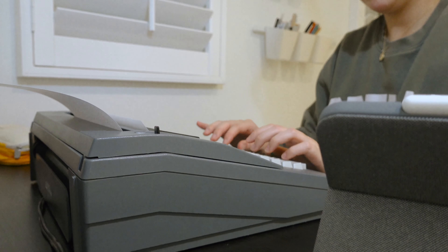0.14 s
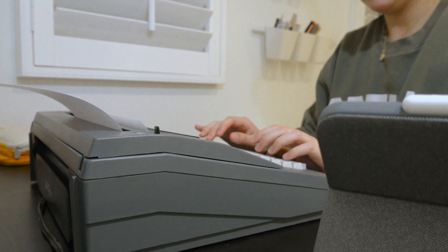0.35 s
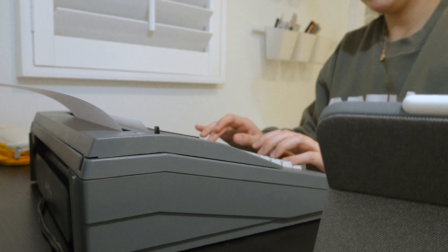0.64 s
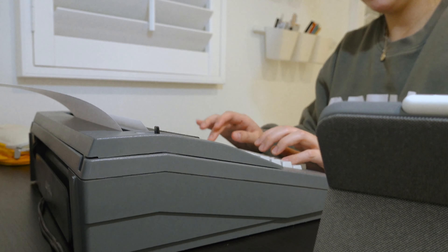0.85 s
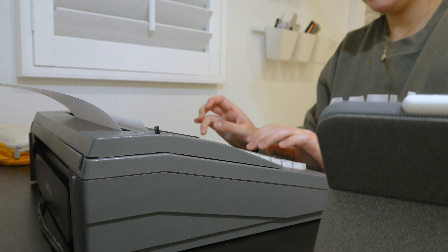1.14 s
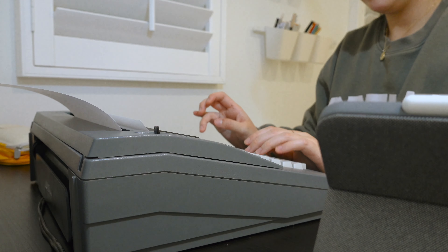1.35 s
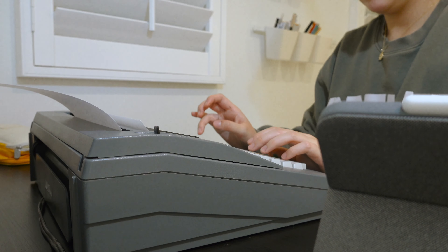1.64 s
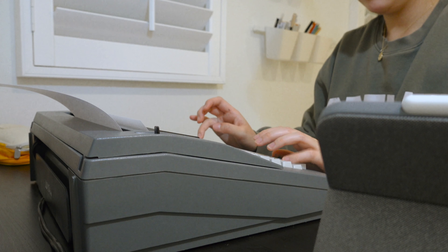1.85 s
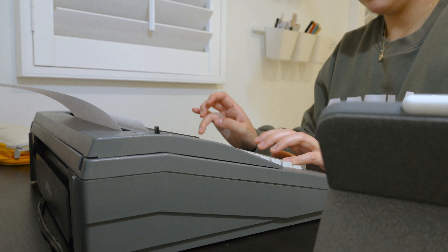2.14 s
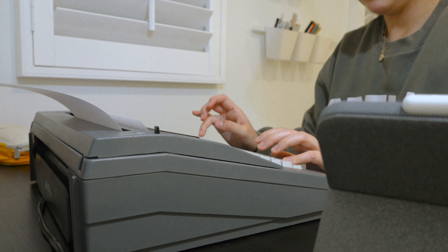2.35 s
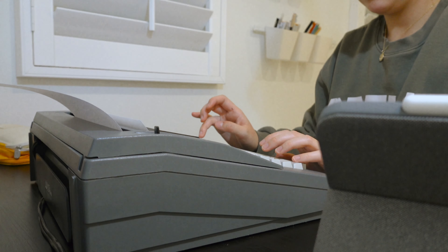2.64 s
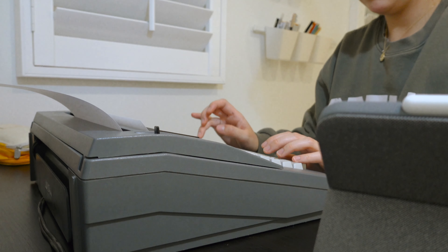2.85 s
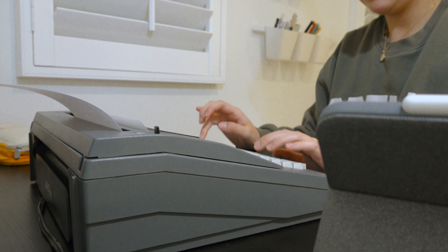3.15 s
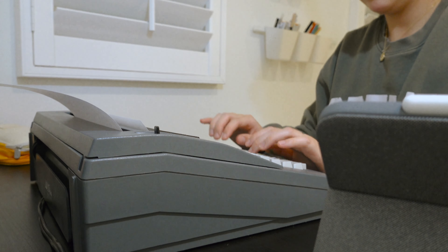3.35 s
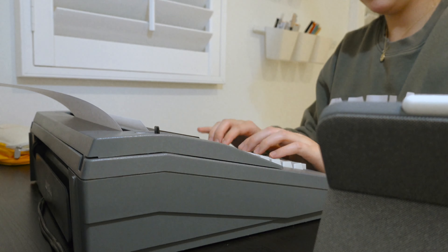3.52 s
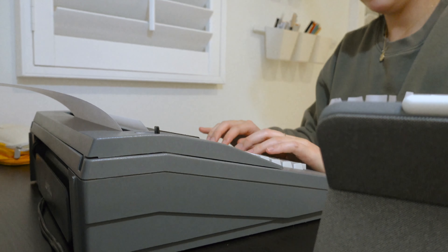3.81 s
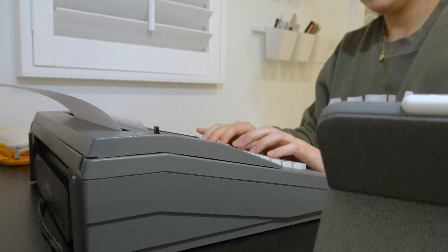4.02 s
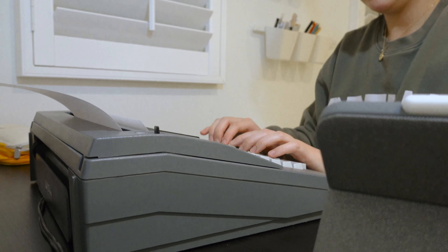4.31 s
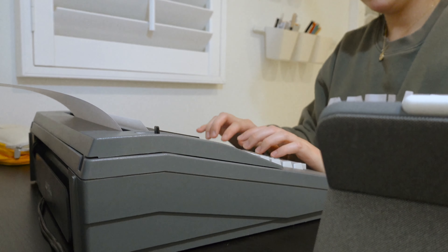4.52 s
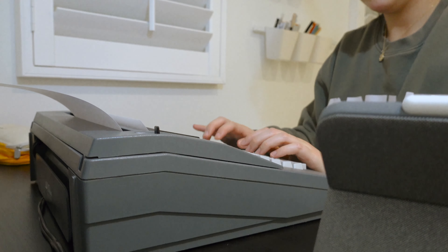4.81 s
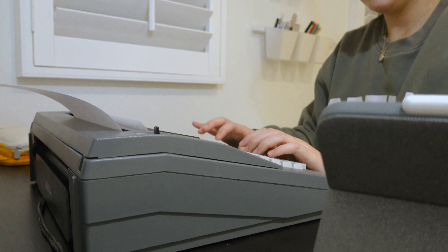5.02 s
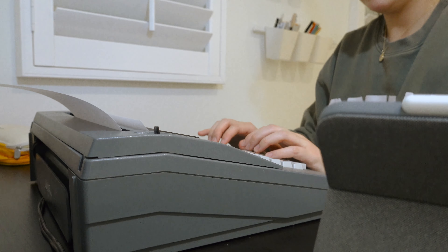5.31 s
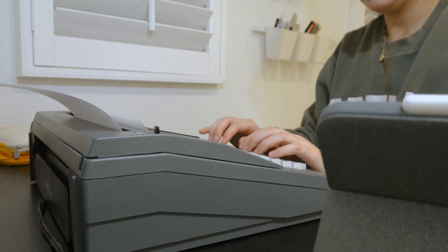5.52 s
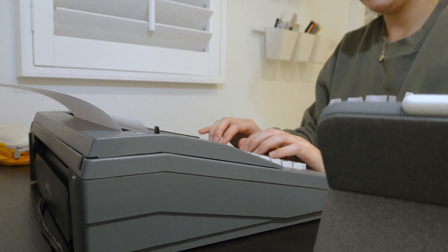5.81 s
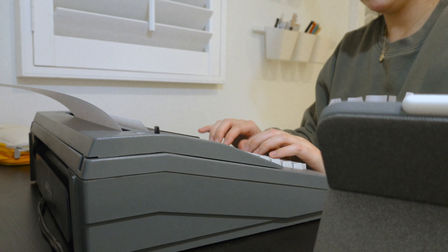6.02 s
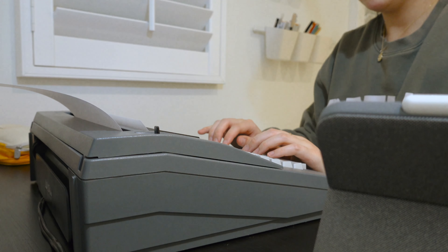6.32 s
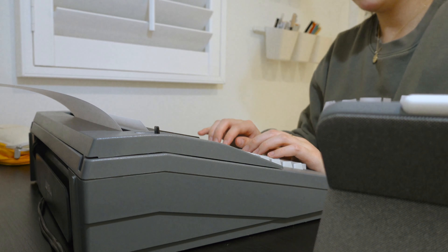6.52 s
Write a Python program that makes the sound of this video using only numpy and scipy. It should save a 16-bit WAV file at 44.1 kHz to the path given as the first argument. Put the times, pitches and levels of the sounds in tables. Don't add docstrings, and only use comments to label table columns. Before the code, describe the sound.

An electric typewriter fires sharp clattering strikes, first a lone one, then a quick run, with brief motor buzzes and quiet key clicks between.

```python
import sys
import numpy as np
from scipy import signal
from scipy.io import wavfile
from scipy.ndimage import uniform_filter1d

SR = 44100
rng = np.random.default_rng(int(sys.argv[2]) if len(sys.argv) > 2 else 0)


def wav_record(signal):
    frames = np.transpose(np.atleast_2d(signal))
    bounded = np.clip(frames, -1, 1)
    quanta = np.round(bounded * 32767).astype(np.int16)
    wavfile.write(sys.argv[1], SR, quanta)


def decibels_to_gain(level_db):
    exponent = np.asarray(level_db, float) / 20
    return 10 ** exponent


N = 294147
T = np.arange(N) / SR


def evened(x):
    return x / np.sqrt(np.mean(x ** 2) + 1e-20)


def unit(taps):
    return taps / np.linalg.norm(taps)


def read(points, hz, column=1):
    points = np.array(points)
    return np.interp(np.log(hz + 1), np.log(points[:, 0] + 1), points[:, column])


def add(mix, s, sound):
    part = mix[..., max(round(s * SR), 0):][..., :sound.shape[-1]]
    part += sound[..., :part.shape[-1]]


def filtered(x, ring):
    ring = ring.reshape((1,) * (x.ndim - 1) + (-1,))
    return signal.oaconvolve(x, ring, axes=-1)[..., :N]


def burst(levels_db, dies_ms, soft, onset_s=0.0012):
    t = T[:6000]
    dies_s = max(dies_ms / 1000, .0008)
    grain = np.minimum(rng.exponential(1, len(t) // 30), 3)
    grains = decibels_to_gain(2.6 * np.repeat(grain, 30))
    envelope = np.exp(-t / dies_s) * (1 - np.exp(-t / onset_s)) * grains
    force = envelope * rng.standard_normal((len(t), 3, 2)).T
    force /= np.linalg.norm(force, axis=2, keepdims=True)
    force[..., 8] += 0.37
    contact = unit(np.convolve([1, soft], [1, soft]))
    force[:, 1] = signal.lfilter(contact, [1], force[:, 1])
    return decibels_to_gain(np.array(levels_db))[:, None] * np.sqrt(dies_s * SR / 2) * force


def hammer_boom_db(force_db):
    return -21.5 + 0.42 * force_db


# start_s, force_db, brightness_db, hammer_return_ms, return_treble_db (against the hit)
STRIKES = [(0.8708, -13, -3, 22.8, -0.5), (3.1674, -15.5, -2, 25.3, -4), (3.3824, -12, -2, 21, -4),
           (3.8576, -12.5, -3, 20, -6.5), (4.0149, -12.5, -0.5, 23.3, -4), (4.1511, -12, -1.5, 21.7, -3.5),
           (4.2743, -12.5, -3, 19, -0.6), (4.3718, -12.5, -1.5, 22.9, -1.5), (4.7596, -12, -2, 24.1, -5),
           (4.9436, -13, -1, 23, -3.5), (5.0419, -13, -1.5, 22, -3), (5.3135, -12.5, -1.5, 24.1, -8.5)]
# delay_s, clatter_db, treble_db, knock_db, dies_ms, softness_0_1
BLOWS = [
    (0, 3.5, 5.5, -4, 4.15, 0.8),
    (.009, 1, -11.5, 4, 4.6, 0.4),
    (0.0173, -17, -0.5, -11.5, 4.9, .8),
    (.036, -11.5, -12.5, -18, 30, 0.6),
    (.059, -6.5, -5.5, -3.5, 3.6, .6),
    (0.074, -19, -23, -19, 3, 0.4),
]
# clatter_db, treble_db, knock_db, dies_ms, softness_0_1
HAMMER_RETURN = (1, 3, -5, 5.5, 0.3)
# delay_s, level_db
SHOVES = [
    (0, 2.5),
    (.024, -11.5),
    (.052, -7.5),
]


def hammer_strikes():
    chatter, push = np.zeros((2, 3, N)), np.zeros(N)
    for s, clatter_db, bright_db, return_ms, return_db in STRIKES:
        treble_db = clatter_db + bright_db
        boom_db = hammer_boom_db(clatter_db)
        stop = HAMMER_RETURN
        back = (return_ms / 1000, stop[0], stop[1] + return_db, *stop[2:])
        for delay, a, b, c, dies, soft in BLOWS + [back]:
            levels_db = [clatter_db - 2 + a, treble_db - 4 + b, boom_db + c]
            add(chatter, s + delay, burst(levels_db, dies, soft))
        scatter = rng.standard_normal(600) * np.exp(-T[:600] * 1000 / 8.3)
        shove = signal.lfilter([1, -1], [1, -.96], 0.39 * unit(scatter))
        shove[0] += 1
        for delay, db in SHOVES:
            add(push, s + delay, decibels_to_gain(boom_db + 2 + db) * shove)
    return chatter, push


# clatter_db, treble_db, knock_db, boom_db, dies_ms
EARLIER = (-38, -46, -52.5, -31.5, 61.5)
# start_s, clatter_db, brightness_db, weight_db
WHEEL = [(0.772, -32.5, -1, -15), (0.784, -20.5, -9.5, -17.5), (0.82, -20, -7.5, -16.5),
         (0.975, -32, -17, 0), (3.078, -27, -9, -21), (3.088, -20, -3.5, -19.5), (3.115, -23, -12, -19.5),
         (3.129, -35, -4.5, -4), (3.319, -16, 1, -20), (3.335, -37, 12, 5.5), (3.565, -31.5, -6.5, -5),
         (3.609, -31, -4.5, -18.5), (3.635, -47.5, -0.5, 5), (3.802, -24.5, -9, -16.5),
         (4.09, -27, -14, -1.5), (4.565, -31, -1, -24.5), (4.676, -16.5, -4.5, -17.5),
         (4.69, -25.5, -2, -10.5), (4.709, -24.5, -10.5, -12), (4.86, -24, 5, -11.5),
         (4.868, -16.5, -13, -11.5), (4.895, -24, 1, -16), (4.905, -18.5, -10, -22.5),
         (5.02, -24, -12.5, -8), (5.259, -25.5, -5.5, -12.5), (5.271, -38.5, -13.5, -0.5)]
# start_s, clatter_db, brightness_db, weight_db
LATCHES = [(0.121, -31, -6.5, -10), (0.225, -35.5, -7.5, -3), (0.305, -43, 2, -16.5),
           (0.614, -46, -2.5, -10.5), (0.647, -28, -6.5, -13.5), (0.678, -37.5, -7, -16),
           (1.252, -41.5, -9, -10), (1.883, -51, -7, -3), (1.923, -31.5, -12.5, -11.5),
           (1.988, -67.5, 19, 11.5), (2.497, -45, -9, -11.5), (3.755, -63.5, 15.5, -11),
           (5.981, -48, -9, -7), (6.096, -35.5, 1.5, -8.5)]
# start_s, knock_db, clatter_db and boom_db (both against the knock)
FINGERS = [(0.634, -40, 4, -18), (1.601, -57.5, 7.5, -6), (1.822, -59, 4, -22), (1.909, -47.5, 12, -32),
           (1.971, -43.5, 10.5, -9), (2.378, -50, 0.5, -20), (2.393, -59, 8, 17), (2.503, -33.5, -24, -41),
           (2.559, -69, -8.5, -20), (2.662, -63, -14, -26), (3.793, -44.5, 7, -10), (5.898, -58.5, 1, 4.5),
           (5.938, -51, -2.5, -8), (6.083, -49, -20, -20)]


def small_events():
    rows = [(0, *EARLIER)]
    for table, boom_db, dies_ms in ((WHEEL, -1.5, 5.57), (LATCHES, -5.5, 6)):
        for s, db, bright, weight in table:
            rows.append((s, db, db + bright, db + weight, db + weight + boom_db, dies_ms))
    for s, db, clatter, boom in FINGERS:
        rows.append((s, db + clatter, db + clatter - 24, db, db + boom, 3.4))
    return rows


def clicks():
    chatter, taps = np.zeros((2, 3, N)), np.zeros(N)
    for s, clatter_db, treble_db, knock_db, boom_db, dies_ms in small_events():
        levels_db = [clatter_db + 0.5, treble_db - 0.5, knock_db + 0.5]
        add(chatter, s, burst(levels_db, dies_ms, soft=.75, onset_s=0.0023))
        add(taps, s, unit(rng.standard_normal(150)) * decibels_to_gain(boom_db + 1.5))
    return chatter, taps


PORT_SHARE = (0.74, 0.057, 1)


def at_ports(chatter):
    share = np.array(PORT_SHARE)[:, None]
    later = np.roll(chatter[0], 3, axis=1)
    right = share * later + np.sqrt(1 - share ** 2) * chatter[1]
    return np.array([chatter[0], right])


# pitch_hz, width_hz, level_db
PANELS = [(691, 40, -2), (763, 26, 6.5), (893, 34, -6), (1193, 95, 9.5), (1064, 1200, 3), (1483, 48, 0)]
# pitch_hz, width_hz, level_db
WORKS = [(1753, 284, -10), (2029, 90, -3), (2213, 430, -8), (2620, 130, 0.5), (2850, 150, 0.5),
         (3246, 315, -1.5), (3518, 130, -0.5), (3679, 210, -2), (3910, 590, -2.5), (4295, 980, -10)]


def resonances(peaks, floor_hz):
    t = T[:4096]
    ring = np.zeros(len(t))
    for k, (hz, width, db) in enumerate(peaks):
        decay = width * np.exp(-np.pi * width * t)
        ring += (-1) ** k * decibels_to_gain(db) * decay * np.sin(2 * np.pi * hz * t)
    return unit(signal.sosfilt(signal.butter(2, floor_hz, "high", fs=SR, output="sos"), ring))


# pitch_hz, level_db (per Hz)
TREBLE = [(2650, -43.5), (4500, -9.5), (5560, -5.5), (6580, -7.5), (8090, -5.5), (13900, -9),
          (15800, -13.5), (16100, -31.5), (16500, -47)]


def cracks():
    hz = abs(np.fft.fftfreq(1024, 1 / SR))
    log_gain = np.log(decibels_to_gain(np.maximum(read(TREBLE, hz), -70)))
    phase = -signal.hilbert(log_gain).imag
    return unit(np.fft.ifft(np.exp(log_gain + 1j * phase)).real[:512])


# pitch_hz, level_db, t60_s
CASE = [(66, -33.5, .15), (119.3, -11.5, .26), (83.2, -23, .16), (138.9, -4, 0.2), (185.3, -15, 0.26),
        (225, -8.5, .22), (264, -15, 0.18), (274.1, -7, 0.2), (300.6, -14, 0.35), (336.7, -2.5, 0.14),
        (359.5, -8.5, 0.36), (417.6, -12, .12), (448.9, 2, 0.12), (481.5, -10.5, 0.24), (536.7, -10, .15),
        (587.8, -6.5, 0.12)]


def case():
    t = T[:SR // 2]
    ring = np.zeros(len(t))
    for k, (hz, db, t60) in enumerate(CASE):
        rise = 1 - np.exp(-(t / 0.011) ** 2 * (hz / 450) ** 0.53)
        ring += (-1) ** k * decibels_to_gain(db - 60 * t / t60) * np.sin(2 * np.pi * hz * t) * rise
    return ring / abs(ring).max()


def damped(boom, db_per_s, tilt):
    if tilt > 0:
        ring = signal.lfilter([1], [1, -tilt], boom)
    else:
        ring = signal.lfilter([1, tilt], [1], boom)
    ring = ring[:6000] * decibels_to_gain(-db_per_s * T[:6000])
    return ring / abs(ring).max()


# start_s, length_s, boom_db, sag_db (over the run), gear_rattle_db
CARRIAGE = [
    (0.132, .13, -31, -16, -8.5),
    (0.947, 0.039, -39, -13, 8.5),
    (3.508, 0.15, -37, -6.5, -3.5),
    (4.476, 0.11, -35.5, -6.5, -5.5),
    (5.098, .18, -37, -5, -6.5),
    (5.972, .13, -33, -10.5, -11),
]


def drive():
    shove, rattle = np.zeros(N), np.zeros(N)
    coast_s, bite_s = .03, 0.044
    for s, length, db, sag_db, rattle_db in CARRIAGE:
        t = np.arange(0, length + 2 * coast_s, 1 / SR)
        coast_db = -23.5 * np.maximum(t - length, 0) / coast_s
        gain = np.minimum(t / 0.027, 1) * decibels_to_gain(db + sag_db * t / length + coast_db)
        clutch_db = 3 * np.exp(-(t / bite_s) ** 2)
        brake_db = 0 * np.exp(-((t - length) / bite_s) ** 2)
        add(shove, s, gain)
        add(rattle, s, gain * decibels_to_gain(rattle_db + clutch_db + brake_db))
    return shove, rattle


def carriage(boom, panels, works, treble):
    unevenness = evened(uniform_filter1d(rng.standard_normal(N), 600))
    turns = np.cumsum(88 * (1 + .25 * unevenness)) / SR
    steps = np.diff(np.floor(turns), prepend=0) * rng.normal(0.98, 1, N)
    rattle = (0.82 + np.exp(-(turns % 1) / 0.34)) * rng.standard_normal(N)
    quick = damped(boom, db_per_s=407, tilt=.94)
    gear_body = panels + .9 * works
    gear_body[:len(treble)] += 0.5 * treble
    shove, shake = drive()
    return decibels_to_gain(-2.5) * (shove * evened(filtered(steps, quick)) + shake * evened(filtered(rattle, gear_body)))


def swing(length, hz, db):
    t = np.arange(0, length, 1 / SR)
    return decibels_to_gain(db) * np.sin(np.pi * t / length) ** 2 * np.sin(2 * np.pi * hz * t)


# start_s, level_db
THUDS = [(0.144, -38), (.29, -57), (1.019, -57.5), (1.921, -67), (2.39, -64), (2.49, -61.5), (3.535, -33),
         (4.486, -34), (5.135, -36), (5.994, -41), (6.08, -46.5)]
# delay_s, length_s, pitch_hz, level_db (against the boom)
RECOIL = [
    (.03, 0.063, 132, -11.5),
    (0.00687, 0.037, 448, -3),
]


def thuds():
    out = np.zeros(N)
    for s, db in THUDS:
        add(out, s, swing(.08, 133.8, db))
    for s, force_db, *_ in STRIKES:
        for after, length, hz, db in RECOIL:
            add(out, s + after, swing(length, hz, hammer_boom_db(force_db) + db))
    return out


# pitch_hz, level_db, t60_s
DESK = [
    (112.3, -37.5, 0.43),
    (137, -35, 0.37),
    (210, -37.5, 0.67),
]


def desk(force):
    t = T[:SR]
    ring = sum(decibels_to_gain(db - 60 * t / t60) * np.sin(2 * np.pi * hz * t) for hz, db, t60 in DESK)
    return filtered(force, ring * (1 - np.exp(-t / .03)))


# start_s, level_db, decay_db_per_s
SPRING = [
    (0.3, -65.5, 24),
    (1.02, -53, 15),
    (1.96, -61.5, 46),
    (2.37, -67.5, 2),
    (2.58, -69, 120),
    (3.62, -53.5, 19),
    (4.56, -62, 61.5),
    (5.44, -52.5, 19.5),
    (6.0, -66, 3),
    (6.12, -61, 30),
]


def ringing():
    s, db, dies = np.transpose(SPRING)
    k = np.maximum(np.searchsorted(s, T) - 1, 0)
    level = decibels_to_gain(db[k] - dies[k] * (T - s[k])) * (T > s[0])
    return uniform_filter1d(level, int(.04 * SR) + 1)


def spring():
    waver = evened(uniform_filter1d(rng.standard_normal(N), 3000))
    level = np.sqrt(2) * ringing() * decibels_to_gain(1.1 * np.roll(waver, SR))
    return level * np.sin(2 * np.pi * np.cumsum(363 + 0.52 * waver) / SR)


def paired_noise(seconds, same, gain):
    frames, hz = int(seconds * SR) // 128 + 5, np.fft.rfftfreq(512, 1 / SR)
    a, b, c, d = rng.standard_normal((frames, 257, 4)).T
    like = read(same, hz)[:, None]
    left, other = a + 1j * b, c + 1j * d
    z = np.array([left, like * left + np.sqrt(1 - like ** 2) * other])
    z *= gain(hz[:, None], np.arange(frames) * 128 / SR)
    return signal.istft(z, nperseg=512, noverlap=384)[1][:, :int(seconds * SR)]


# pitch_hz, t60_s, level_db
ROOM = [(99, 0.5, -4), (363, 0.38, 7), (1021, 0.52, 6), (2700, 0.55, 0), (5185, 0.51, 4.5),
        (13000, 0.31, 2.5)]
# pitch_hz, likeness
ROOM_SAME = [(60, 1), (150, 1.0), (380, 1), (950, 0.73), (2380, 0.75), (5980, -0.67), (15000, 0.38)]


def echo_level(hz, t):
    fall_db = -60 * t / read(ROOM, hz)
    return decibels_to_gain(read(ROOM, hz, column=2)) * np.hypot(decibels_to_gain(fall_db), decibels_to_gain(-22 + fall_db / 1.5))


def room(x, count):
    out = np.zeros((2, N))
    for k in range(count):
        tail = paired_noise(.9, ROOM_SAME, echo_level)
        tail *= np.clip((T[:tail.shape[1]] - .002) / 0.0027, 0, 1)
        turn = 1
        if count > 1:
            turn = np.sqrt(2 / count) * np.cos(2 * np.pi * (2.3 * T + k / count))
        out += signal.fftconvolve((x * turn)[None], tail / np.linalg.norm(tail[0]), axes=1)[:, :N]
    return out


# pitch_hz, level_db (per Hz)
AIR = [(18, -78), (30, -48.5), (323, -11.5), (359, -3), (399, -20.5), (676, -14.5), (814, -2), (1270, -15),
       (1450, -7.5), (1620, -11.5), (3760, -19), (5440, -20), (12000, -22), (15200, -19.5), (16500, -43)]
# pitch_hz, likeness
AIR_SAME = [(60, 0.88), (240, 0.71), (950, 0.18), (3770, 0.27), (15000, -0.091)]
# pitch_hz, level_db
WHINE = (15474, -95)


def air():
    hiss = paired_noise(N / SR + .01, AIR_SAME, lambda hz, t: decibels_to_gain(read(AIR, hz)))[:, :N]
    whine_hz, whine_db = WHINE
    return decibels_to_gain(-65) * evened(hiss) + decibels_to_gain(whine_db - 1) * np.sin(2 * np.pi * whine_hz * T)


def scene():
    works, panels = resonances(WORKS, 1200), resonances(PANELS, 300)
    boom, treble = case(), cracks()
    hits, push = hammer_strikes()
    ticks, taps = clicks()
    chatter = at_ports(hits + ticks)
    bright = sum(filtered(chatter[:, k], body) for k, body in enumerate((works, treble, panels)))
    rocking = thuds()
    tapped = filtered(signal.lfilter([1, -.97], [1, -.93], taps), damped(boom, db_per_s=198.5, tilt=-0.79))
    low = filtered(push, boom) + tapped + carriage(boom, panels, works, treble)
    low += desk(push + decibels_to_gain(4) * taps + decibels_to_gain(-50.5) * rocking)
    echo = decibels_to_gain(-5) * room(bright[0], count=3) + decibels_to_gain(-5.5) * room(low + decibels_to_gain(-14) * rocking, count=1)
    lean = decibels_to_gain(np.array([[.4], [-.4]]))
    low_lean = decibels_to_gain(np.array([[.1], [-.1]]))
    return (bright + echo) * lean + (low + rocking + spring()) * low_lean + air()


def band_limit(x):
    return signal.sosfilt(signal.butter(12, 16970, fs=SR, output="sos"), x)


def record(dry):
    cut = signal.sosfilt(signal.butter(3, 85, "high", fs=SR, output="sos"), dry)
    return band_limit(0.78 * np.tanh(cut / 0.83))


dry = scene()
out = record(dry)
wav_record(out)
```